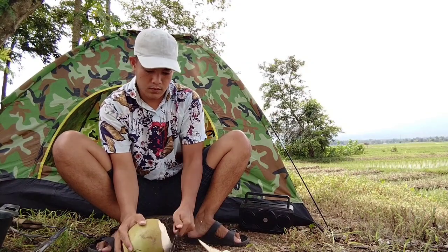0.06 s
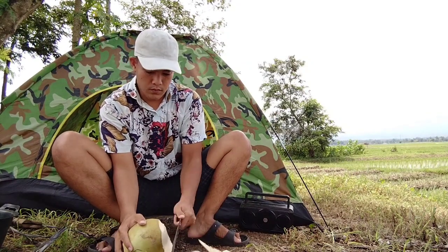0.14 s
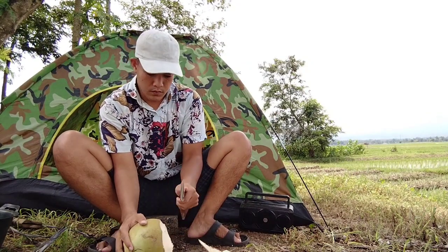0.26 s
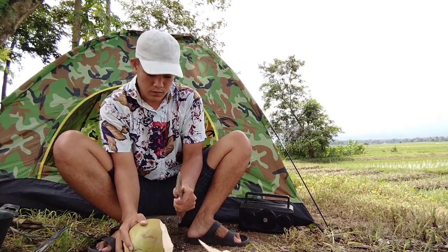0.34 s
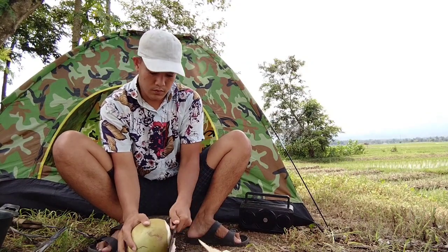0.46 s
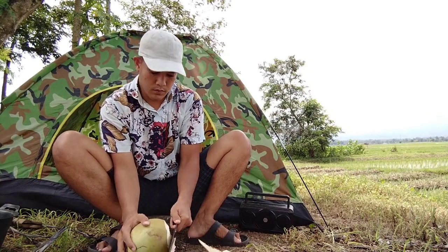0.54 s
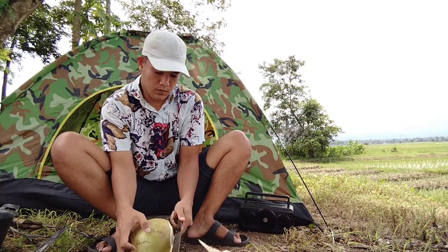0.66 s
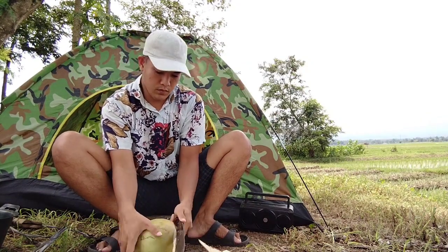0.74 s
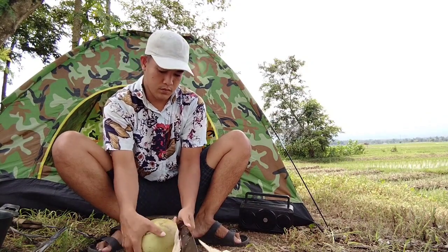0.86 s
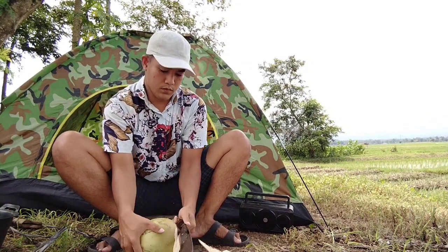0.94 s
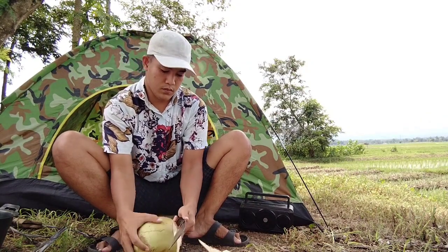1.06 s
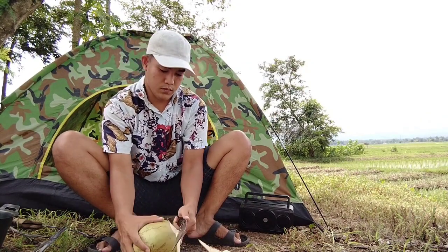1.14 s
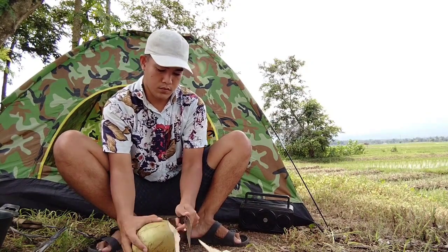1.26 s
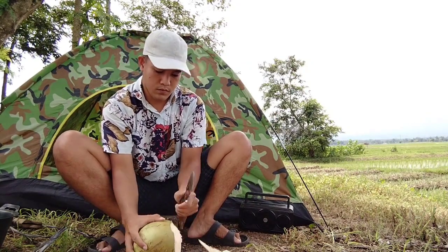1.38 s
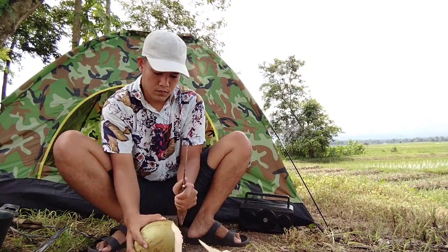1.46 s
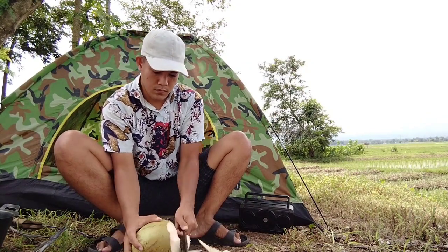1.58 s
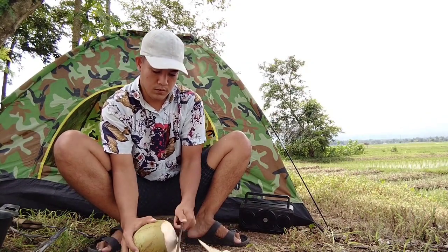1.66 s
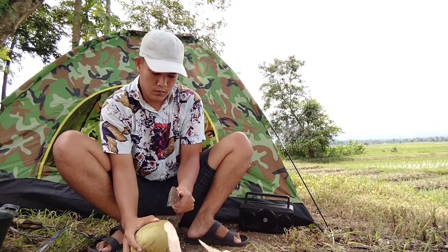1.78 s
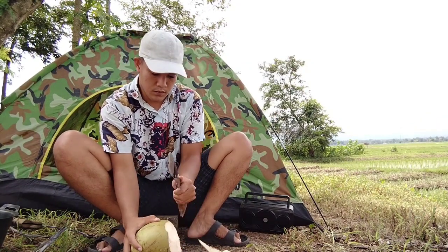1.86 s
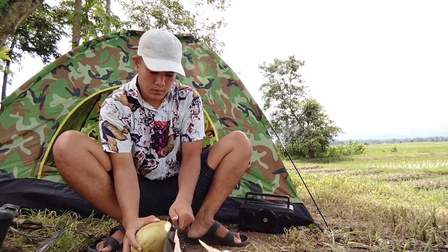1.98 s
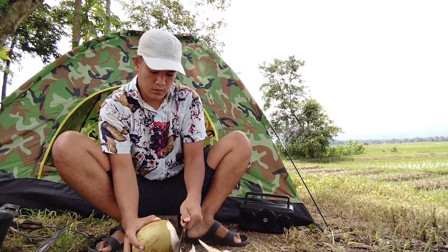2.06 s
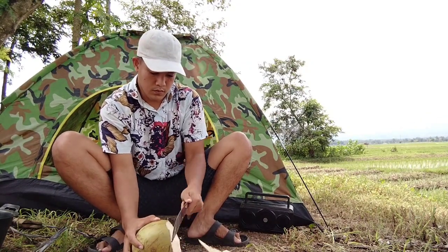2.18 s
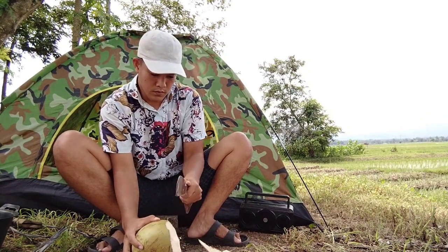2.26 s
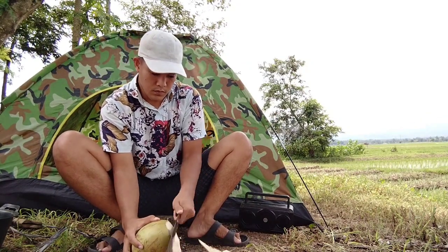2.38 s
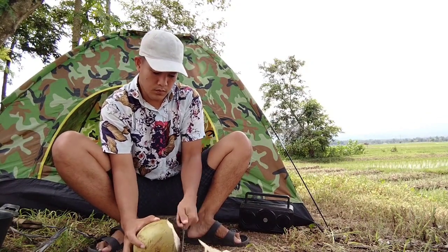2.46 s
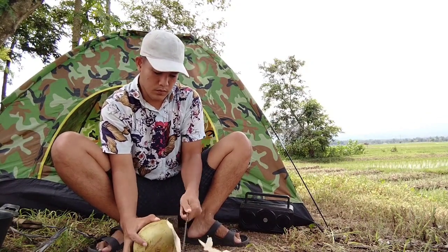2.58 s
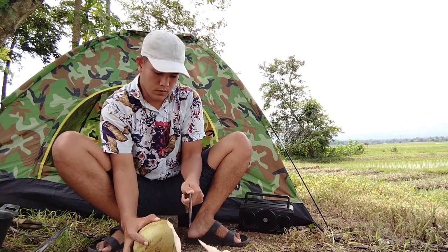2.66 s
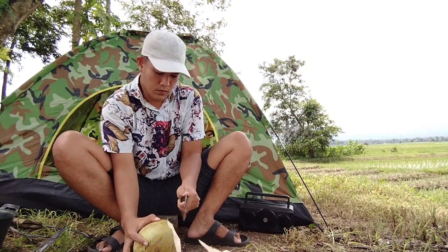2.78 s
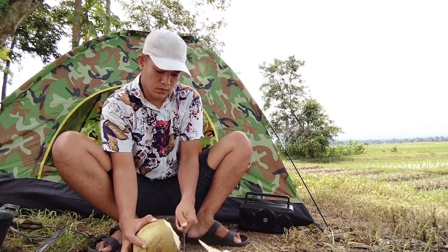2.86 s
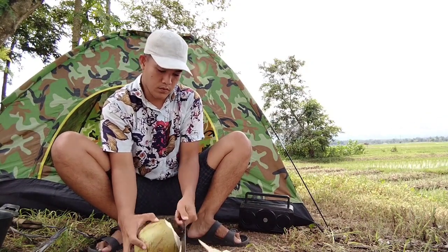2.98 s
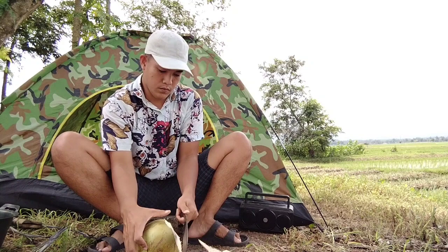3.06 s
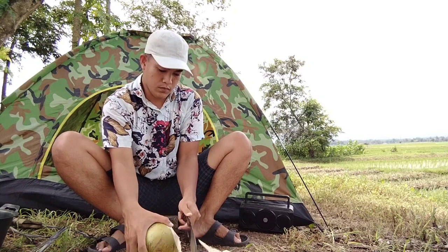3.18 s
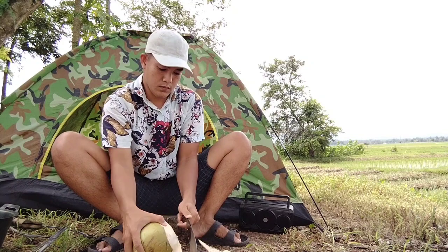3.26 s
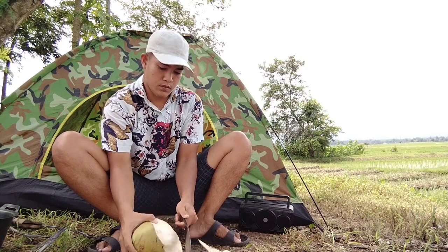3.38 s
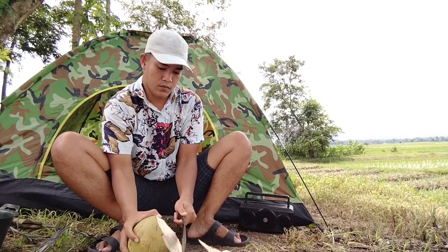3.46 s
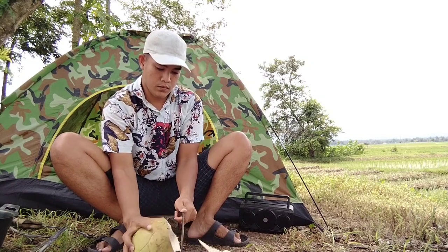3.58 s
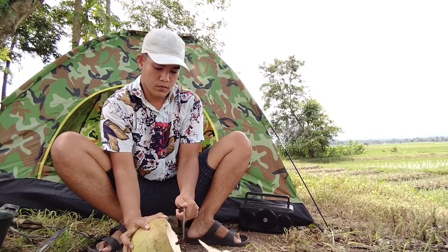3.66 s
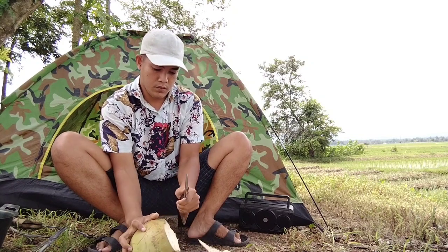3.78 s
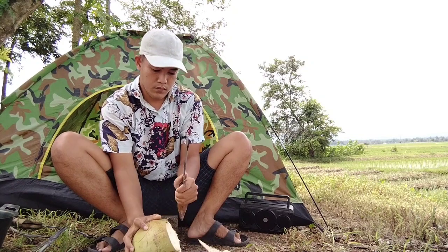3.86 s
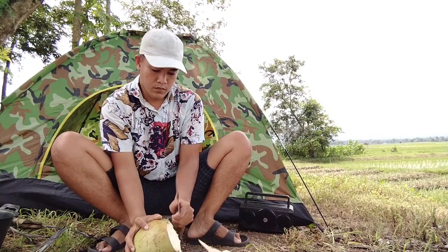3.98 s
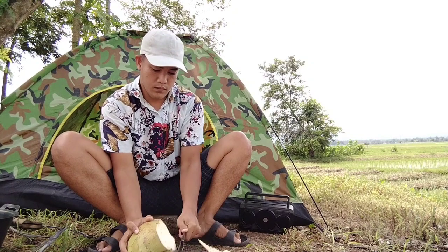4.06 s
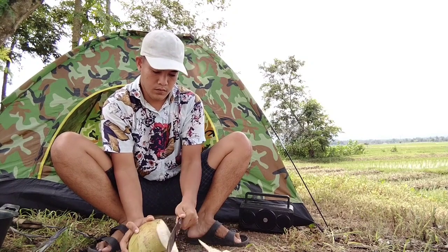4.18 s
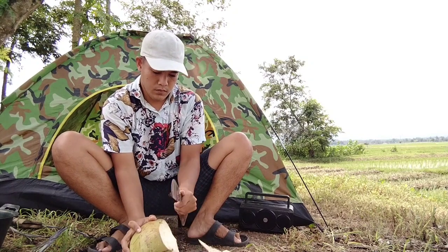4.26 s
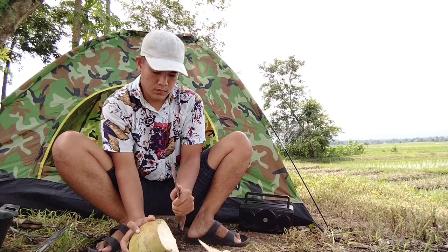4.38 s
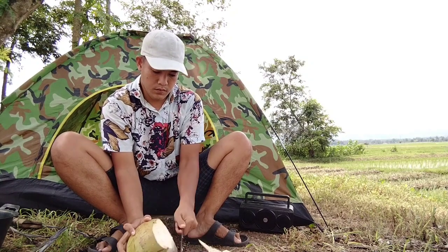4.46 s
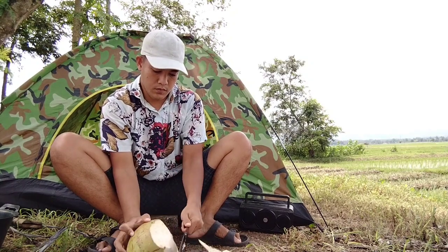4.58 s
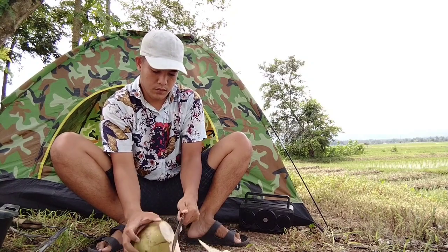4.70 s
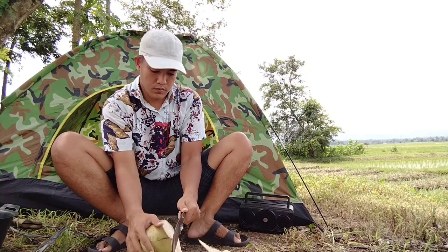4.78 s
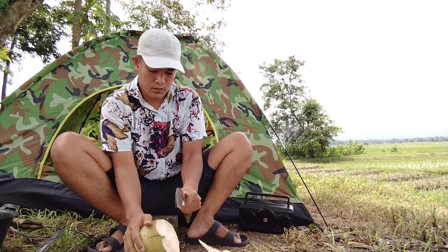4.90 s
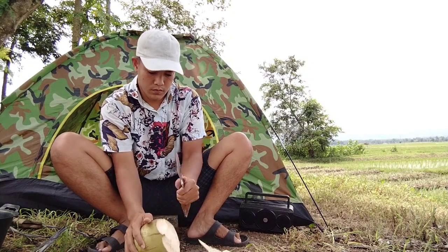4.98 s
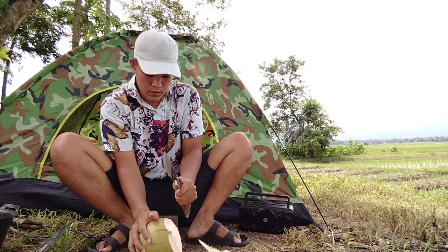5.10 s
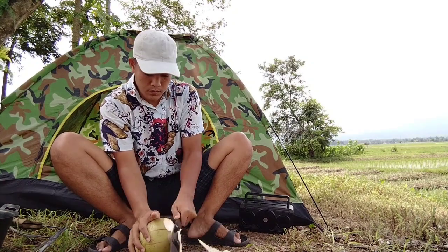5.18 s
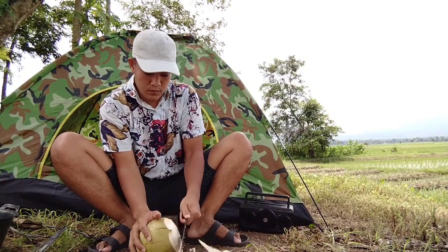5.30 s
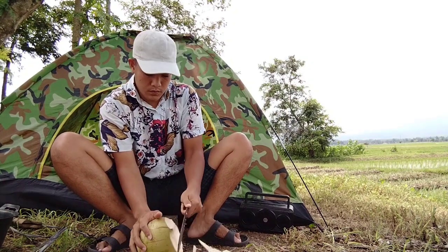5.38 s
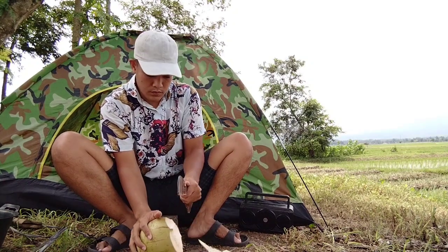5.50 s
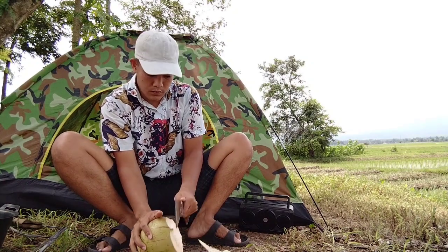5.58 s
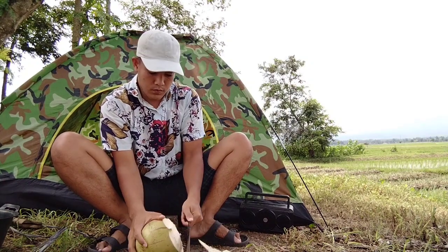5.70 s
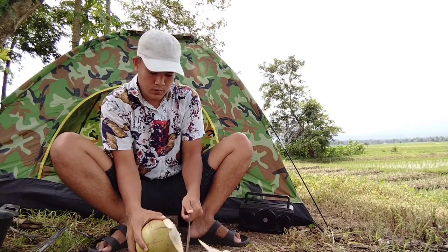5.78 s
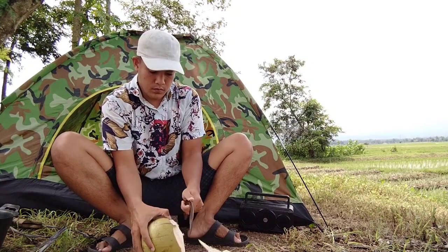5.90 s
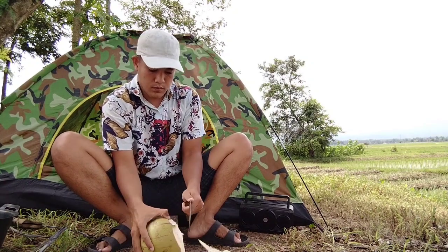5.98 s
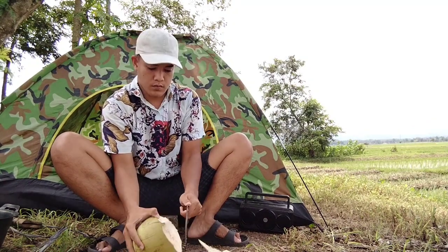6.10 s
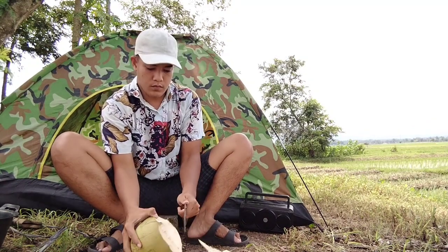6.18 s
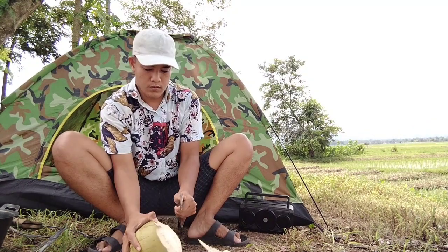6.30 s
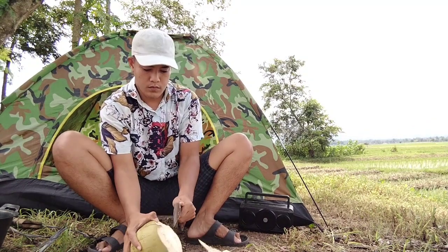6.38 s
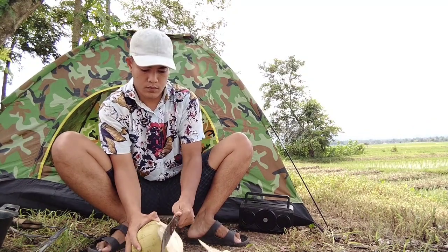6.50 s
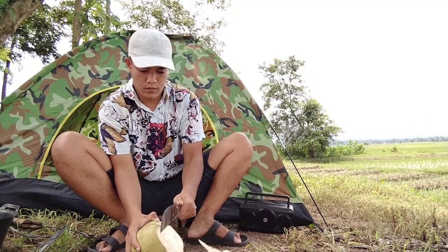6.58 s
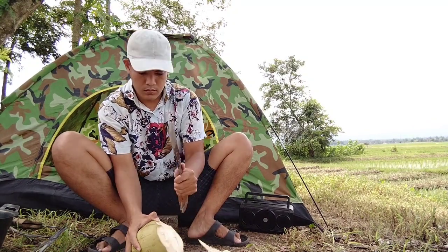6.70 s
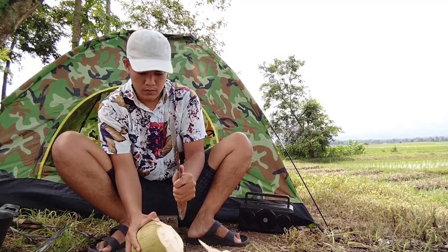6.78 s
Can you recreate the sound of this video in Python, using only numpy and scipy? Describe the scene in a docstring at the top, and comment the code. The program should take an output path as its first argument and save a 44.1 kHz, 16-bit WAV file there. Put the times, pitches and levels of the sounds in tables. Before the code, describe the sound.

Close, crisp chops bite into a fibrous coconut with a faint blade ring and dull ground thump, over quiet outdoor air and faint birds.

```python
"""At the edge of an open field, close by, a machete chops the husk off a green coconut on the ground.
Each blow is a burst of torn-fibre noise that rings the blade, knocks on the hollow nut and thuds into soil.
Some slabs split off, crumbs tick into the grass, and light taps and scuffs fall between the blows.
Trees scatter a faint echo as decaying noise; a clack and small gliding bird whistles come from farther off.
Beneath lie low background noise of changing level, a receding drone and a thin hiss, all coloured noise."""
import sys
import numpy as np
from scipy import signal
from scipy.fft import rfft, irfft, next_fast_len
from scipy.io import wavfile
from scipy.ndimage import uniform_filter1d

SR = 44100
rng = np.random.default_rng(int(sys.argv[2]) if len(sys.argv) > 2 else 0)


def pcm_store(signal):
    """Save signal as 16-bit PCM."""
    levels = np.round(np.clip(np.atleast_2d(signal), -1, 1) * 32767)
    wavfile.write(sys.argv[1], SR, levels.astype(np.int16).T)


N = 301637
TIME = np.arange(N) / SR  # seconds


def amp(db):
    """Decibels to gain."""
    return 10 ** (np.asarray(db) / 20)


def unit(x):
    """Scale to rms 1."""
    return x / np.sqrt(np.mean(x ** 2))


def burst(x, db):
    """Give a short sound the energy of 20 ms at this rms level."""
    return x * amp(db) * np.sqrt(0.02 * SR / np.sum(x ** 2))


def add(track, start, x):
    """Mix a sound into the track at a time in seconds, cut off at the track's end."""
    i = max(int(start * SR), 0)
    track[i:i + len(x)] += x[:max(N - i, 0)]


def colour(x, points):
    """Minimum-phase filter through (Hz, dB) points, so that no sound precedes its cause."""
    size = next_fast_len(2 * len(x), True) // 2 * 2
    hz, db = np.transpose(points)
    bin_hz = np.fft.rfftfreq(size, 1 / SR)
    log_gain = np.log(amp(np.interp(np.log(bin_hz + 1), np.log(hz), db)))
    # folding the cepstrum onto positive time makes the filter causal
    cepstrum = irfft(log_gain)
    cepstrum[1:size // 2] *= 2
    cepstrum[size // 2 + 1:] = 0
    response = np.exp(rfft(cepstrum))
    return irfft(rfft(x, size) * response)[:len(x)]


def band(x, lo_hz, hi_hz):
    """Band-pass."""
    edges = [lo_hz, min(hi_hz, 0.48 * SR)]
    return signal.sosfilt(signal.butter(N=3, Wn=edges, btype="band", fs=SR, output="sos"), x)


def resonate(x, hz, width):
    """One damped mode, gain 1 at its centre; a wider mode dies sooner."""
    b, a = signal.iirpeak(min(hz, SR / 2 - 1), hz / width, fs=SR)
    return signal.lfilter(b, a, x)


def waver(rate):
    """Smooth random drift with this many new targets a second, spread near 1."""
    hold = int(SR / rate)
    steps = np.repeat(rng.standard_normal(N // hold + 1), hold)
    return 1.2 * uniform_filter1d(steps, hold)[:N]


# Level of the low background noise, which sinks in the pauses between blows, before its gain and waver.
# Each row: time in seconds, level in dB.
LOW_NOISE_LEVEL = [(0, -66), (0.35, -58.5), (0.95, -67), (1.2, -62.5), (1.58, -75.5), (1.9, -64),
                   (2.3, -57.5), (2.85, -74), (3.2, -59), (3.46, -66), (3.66, -58), (3.95, -72.5),
                   (4.3, -56.5), (5.45, -56), (6.05, -65), (6.3, -63.5), (6.84, -71.5)]
# Colour of the low background noise. Each row: frequency in Hz, gain in dB.
LOW_NOISE_COLOUR = [(20, -34), (40, -22), (65, -7), (90, -1.5), (125, 5.5), (165, -2.5), (230, -21),
                    (400, -53.5)]
# Colour of the far traffic's drone. Each row: frequency in Hz, gain in dB.
DRONE_COLOUR = [(100, -25.5), (160, -6.5), (205, -1), (255, -4.5), (310, -12), (400, -34.5), (700, -52)]
# Colour of the hiss of air. Each row: frequency in Hz, gain in dB.
AIR_COLOUR = [(200, -6), (500, 2.5), (1000, -2.5), (2000, -6), (4000, -9), (8000, -8.5), (15000, -11)]
DRONE_START_DB, DRONE_FADE_DB_PER_S, DRONE_REST_DB = -55.5, 8.5, -81.5  # far traffic recedes
SWELL_START_S, SWELL_END_S = 1.91, 2.07


def field(low_noise_gain_db=-1, air_db=-86.0, waver_db=3, swell_db=-61):
    """Wavering low background noise and a fading drone of far traffic under a thin hiss of air."""
    low_noise = unit(colour(rng.standard_normal(N), LOW_NOISE_COLOUR))
    drone = unit(colour(rng.standard_normal(N), DRONE_COLOUR))
    air = unit(colour(rng.standard_normal(N), AIR_COLOUR))
    s, level_db = np.transpose(LOW_NOISE_LEVEL)
    low_noise_db = np.interp(TIME, s, level_db) + low_noise_gain_db + waver_db * waver(14)
    drone_db = np.maximum(DRONE_START_DB - DRONE_FADE_DB_PER_S * TIME, DRONE_REST_DB)
    out = low_noise * amp(low_noise_db) + drone * amp(drone_db) + air * amp(air_db)
    # once, a soft hollow swell rises out of the background
    shape = np.hanning(int((SWELL_END_S - SWELL_START_S) * SR))
    swell = shape * band(rng.standard_normal(len(shape)), 320, 460)
    add(out, SWELL_START_S, burst(swell, swell_db))
    return out


def fibres(swell, fade, stall=0.2, grain_db=4.0, rise_power=0.9, stall_fade=0.0011):
    """Snapping fibres of uneven strength: stronger as the edge sinks in, weaker as it slows, then stalled."""
    t = TIME[:SR // 4]
    rise = np.minimum(t / swell, 1) ** rise_power
    slowing = np.maximum(t - swell, 0) / fade
    sticking = np.maximum(t - stall, 0) / stall_fade
    force = rise * np.exp(-slowing - sticking)
    strength_db = grain_db * np.minimum(rng.exponential(size=len(t)), 5)
    return force * rng.standard_normal(len(t)) * amp(strength_db)


def ground_bounce(x, share=0.14):
    """The soil returns the sound one to three milliseconds later, which combs its spectrum."""
    lag = int(rng.uniform(0.001, 0.003) * SR)
    bounced = np.pad(x, (lag, 0))[:len(x)]
    return (x + share * bounced) / np.hypot(1, share)


# Colour of tearing husk. Each row: frequency in Hz, gain in dB.
HUSK_COLOUR = [(150, -6), (300, -1), (450, -1.5), (800, -5), (1000, -2.5), (1600, 1), (2700, -2.5),
               (4000, -1.5), (5600, -1.5), (7300, 3), (8300, 1.5), (9300, -5), (12500, -4.5), (15000, -6)]
# Blade resonances, damped by the husk. Each row: frequency in Hz, width in Hz, gain in dB.
BLADE_MODES = [(1644.4, 170, -10), (2150, 130, -1), (3343, 110, -5), (3790, 280, -9), (5180, 150, -6.5),
               (6160, 66, -3), (7140, 240, 0.5), (8140, 280, -5.5), (15500, 320, -3)]


def crackle(snaps, low_db, mid_db, top_db, blade_share=1):
    """The snaps sound through husk and blade; depth and angle of the edge set the balance."""
    husk = colour(snaps, HUSK_COLOUR)
    blade = sum(amp(db) * resonate(husk, hz, width) for hz, width, db in BLADE_MODES)
    x = husk + blade_share * blade
    low = burst(band(x, 200, 1000), low_db)
    mid = burst(band(x, 1000, 5000), mid_db)
    top = burst(band(x, 5000, 17000), top_db)
    return low + mid + top


def cut(swell, fade, stall, levels, knock_hz, knock_db, knock_fade=0.009, side_knock_db=-9):
    """One bite crackles and knocks on the hollow nut; returns its front and the plainer sound to the sides."""
    t = TIME[:SR // 4]
    # the nut's cavity builds up while the blade pushes, then rings out
    knock_shape = np.minimum(t / swell, 1) ** 2 * np.exp(-t / knock_fade)
    knock = burst(np.sin(2 * np.pi * knock_hz * t) * knock_shape, knock_db)
    front = crackle(ground_bounce(fibres(swell, fade, stall)), *levels) + knock
    # no blade resonance reaches the sides, and less of the knock
    sides = crackle(fibres(swell, fade, stall), *levels, blade_share=0) + knock * amp(side_knock_db)
    return front, sides


def ring(snaps, hz, width, db):
    """A mode shaken by the snaps, with steep skirts from a second, wider resonance."""
    return burst(resonate(resonate(snaps, hz, width), hz, 5 * width), db)


# Colour of the longer echo from the trees. Each row: frequency in Hz, gain in dB.
TREE_COLOUR = [(100, 7.5), (300, 10.5), (600, 3), (1200, 0.5), (2500, -2.5), (5000, -6), (8000, -7.5),
               (15000, -6.5)]


def surroundings(x, near_db=-22, near_t60=0.11, near_delay=0.027,
                 far_db=-29, far_t60=1.9, far_delay=0.031, edge_s=0.19, edge_fade=0.04):
    """Tent and ground return a short scatter; the grove returns a longer one that ends at its far edge."""
    t = TIME[:SR // 2]
    near_rise = np.minimum(t / near_delay, 1) ** 2
    near_decay = amp(-60 * np.maximum(t - near_delay, 0) / near_t60)
    near = rng.standard_normal(len(t)) * near_rise * near_decay
    near = colour(near, [(100, 7), (600, 1.5), (2000, 1.5), (5000, -3.5), (7500, 1.0), (10000, -2),
                         (15000, -4.5)])
    # uneven grains stand for the scattered trees
    far = rng.standard_normal(len(t)) * amp(4.5 * np.minimum(rng.exponential(size=len(t)), 2))
    far *= np.minimum(t / far_delay, 1) ** 2 * amp(-60 * t / far_t60)
    far /= 1 + np.exp((t - edge_s) / edge_fade)
    far = colour(far, TREE_COLOUR)
    response = amp(near_db) * near / np.linalg.norm(near) + amp(far_db) * far / np.linalg.norm(far)
    return signal.fftconvolve(x, response)[:N]


def blur(x, wander_hz=45, hold_s=0.018):
    """Let the pitch of an echo wander quickly, so that it washes out instead of ringing."""
    steps = np.arange(256)
    shift_hz = wander_hz * np.interp(TIME[:len(x)] / hold_s, steps, rng.standard_normal(len(steps)))
    analytic = signal.hilbert(x, next_fast_len(len(x)))[:len(x)]
    return np.real(analytic * np.exp(2j * np.pi * np.cumsum(shift_hz) / SR))


# Machete blows, close by. Each row: start in seconds, swell in seconds, fade in seconds, mid crackle in dB,
# brightness in dB (added to the treble, taken from the low), knock in Hz, knock in dB, ring in Hz,
# ring in dB, thud in dB.
BLOWS = [(0.093, 0.013, 0.0053, -28, 1.5, 496, -51, 3916, -28, -35.5),
         (.5243, 0.0073, 0.0058, -30, 2, 555, -35.5, 1680, -33, -25),
         (1.6693, 0.0043, 0.0074, -32, 0.5, 555, -36, 2282, -37, -43),
         (2.093, 0.0041, 0.0093, -31, 1, 462, -43, 2170, -29.5, -28),
         (2.5079, 0.0047, .01, -32, 1, 464, -43.5, 2198, -30.5, -30.5),
         (2.947, 0.011, .0025, -30, -0.5, 474, -41, 2106, -34, -27),
         (4.1252, 0.0048, .006, -38.5, 1.5, 566, -39.5, 2154, -40, -38),
         (4.5671, 0.0056, 0.005, -42, 2, 565, -37, 1294, -45.5, -31.5),
         (5.291, 0.0041, 0.009, -33, 1, 663, -41.5, 2290, -51.5, -34),
         (5.7264, .0043, 0.0081, -32, -3, 610, -38.5, 1350, -33.5, -26.5),
         (6.561, 0.002, 0.0055, -55.5, 2.5, 561, -46, 1248, -55, -46.5)]
# The slab of husk splits off as the blade follows through. Each row: start in seconds, mid crackle in dB,
# brightness in dB, knock in Hz, knock in dB, thud in dB.
SLAB_SPLITS = [(0.119, -45.5, -0.5, 413, -46.5, -48.5), (1.704, -52, -2, 323, -46.5, -42),
               (2.972, -48.5, 2, 396, -55, -46), (4.158, -57.5, -2, 330, -46, -36),
               (4.6114, -51.5, -2.5, 338, -49.5, -33.5), (5.329, -55.5, -0.5, 340, -57.5, -42.5),
               (5.756, -42, 4, 297, -55, -61)]
STALL_S = 0.022  # the blade sticks this long after it enters
# the low crackle gains only this many dB per dB of force
FULL_BLOW_DB, FULL_LOW_DB, LOW_GROWTH = -32.5, -37.5, 0.42
SIDE_GROWTH_DB_PER_DB = -0.38  # a light, glancing blow throws more of its sound to the sides
SPLIT_SWELL_S, SPLIT_FADE_S, SPLIT_STALL_S = 0.0045, 0.0055, 0.015
SPLIT_LOW_DB = 1.5  # low crackle over mid, before brightness


def chops(ring_width=120):
    """Blows cut and ring the wedged blade, some split slabs; the nut turns, so each cut has its own echo."""
    out = np.zeros(N)
    for s, swell, fade, db, bright_db, knock_hz, knock_db, ring_hz, ring_db, _ in BLOWS:
        force_db = db - FULL_BLOW_DB
        low_db = FULL_LOW_DB + LOW_GROWTH * force_db - bright_db
        levels = (low_db, db, db + bright_db)
        front, sides = cut(swell, fade, STALL_S, levels, knock_hz, knock_db)
        blade_ring = ring(fibres(swell, fade / 2, STALL_S), ring_hz, ring_width, ring_db)
        add(out, s, front + blade_ring)
        add(out, s, blur(surroundings(sides)) * amp(SIDE_GROWTH_DB_PER_DB * force_db))
    for s, db, bright_db, knock_hz, knock_db, _ in SLAB_SPLITS:
        levels = (db + SPLIT_LOW_DB - bright_db, db, db + bright_db)
        front, sides = cut(SPLIT_SWELL_S, SPLIT_FADE_S, SPLIT_STALL_S, levels, knock_hz, knock_db)
        add(out, s, front)
        add(out, s, surroundings(sides))
    return out


def low_noise_swells(swell_db=-58, rise_s=0.058, fade_s=0.13, lo_hz=100, hi_hz=270):
    """A low band of background noise swells up after each blow and fades, stronger after a harder one."""
    out, t = np.zeros(N), TIME[:SR // 2]
    shape = np.minimum(t / rise_s, 1) * np.exp(-t / fade_s)
    for s, _, _, db, *_ in BLOWS:
        swell = band(rng.standard_normal(len(t)), lo_hz, hi_hz) * shape
        add(out, s, burst(swell, swell_db + LOW_GROWTH * (db - FULL_BLOW_DB)))
    return out


# The nut is rocked back onto the soil. Each row: time of the deepest push in seconds, thud in dB.
NUT_SET_DOWNS = [(1.278, -42.5), (6.379, -41.5)]
THUD_LAG_S, THUD_HZ = 0.0205, 105.6  # the deepest push into the soil follows each blow
SPLIT_THUD_LAG_S, SPLIT_THUD_HZ = 0.0105, 130  # a split comes sooner, with a stiffer bob


def thuds(half_width=0.0078, rock_hz=205, rock_db=-13):
    """At every push the nut bobs for a cycle or two on the springy soil, and rocks faster than it bobs."""
    pushes = [(s + THUD_LAG_S, db, THUD_HZ) for s, *_, db in BLOWS]
    pushes += [(s + SPLIT_THUD_LAG_S, db, SPLIT_THUD_HZ) for s, *_, db in SLAB_SPLITS]
    pushes += [(s, db, THUD_HZ) for s, db in NUT_SET_DOWNS]
    out, lead = np.zeros(N), 0.04
    t = TIME[:int(2 * lead * SR)] - lead  # zero at the deepest push
    rock = amp(rock_db) * np.sin(2 * np.pi * rock_hz * t)
    for s, db, hz in pushes:
        bob = np.cos(2 * np.pi * hz * t)
        add(out, s - lead, amp(db) * (bob + rock) * np.exp(-(t / half_width) ** 2))
    return out


def crumbs(count=8, below_db=-43, spread_db=3, first_s=0.031, last_s=0.054, fall_db_per_s=60):
    """Bits of husk thrown off by each blow tick down into dry grass, the later ones softer on average."""
    out = np.zeros(N)
    for s, _, _, db, *_ in BLOWS:
        flights = first_s + (last_s - first_s) * rng.random(count)
        sizes = rng.standard_normal(count)
        for flight, size in zip(flights, sizes):
            tick_db = db + below_db + spread_db * size - fall_db_per_s * (flight - first_s)
            tick = band(fibres(0.00052, 0.0009), 1200, 11980)
            add(out, s + flight, burst(tick, tick_db))
    return out


def touch(swell, fade, levels, ring_hz, ring_db, ring_width, catch_db, bounce, catch_s=0.012):
    """A light, gritty contact that catches and slips on the husk."""
    snaps = ground_bounce(fibres(swell, fade, grain_db=8.0), share=bounce)
    drift = np.interp(TIME[:len(snaps)] / catch_s, np.arange(256), rng.standard_normal(size=256))
    catches = amp(catch_db * drift)
    return crackle(snaps * catches, *levels) + ring(fibres(swell, fade), ring_hz, ring_width, ring_db)


# Light taps of blade and chips. Each row: start in seconds, fade in seconds, mid level in dB,
# brightness in dB (added to the treble, taken from the low), ring in Hz, ring in dB.
LIGHT_TAPS = [(0.186, 0.0093, -63, -0.5, 463, -54.5), (1.251, 0.014, -62, -0.5, 2220, -63),
              (3.228, 0.0087, -79.5, 16, 7350, -68), (3.689, 0.018, -71.5, 1, 1134, -65.5),
              (4.0456, 0.0007, -75, 23.5, 2520, -69.5), (4.195, 0.016, -61.5, -2.5, 1346, -59),
              (5.93, 0.0041, -80, 3, 4610, -74), (6.3511, 0.0078, -67.5, 8, 2130, -75)]
# The hand scuffs the husk. Each row: start in seconds, fade in seconds, treble level in dB, ring in Hz,
# ring in dB.
HAND_SCUFFS = [(.292, 0.027, -60.5, 2910, -68), (0.754, 0.036, -72, 4500, -73),
               (.863, 0.019, -73.5, 7450, -76), (0.888, .018, -68.5, 2300, -79),
               (.921, 0.033, -71, 1376, -79), (1.162, 0.056, -66, 4070, -64.5),
               (3.72, 0.064, -81.5, 8600, -82.5), (4.38, 0.022, -78, 7300, -76.5),
               (6.372, 0.046, -69.5, 8190, -74)]
TAP_SWELL_SHARE = 0.26  # swell time as a share of the fade
SCUFF_SWELL_S = 0.007
SCUFF_LOW_DB, SCUFF_MID_DB = -20, -10  # relative to the treble


def touches():
    """Light taps, and the scuff of the hand as it turns the nut: gritty contacts, each with a small ring."""
    out = np.zeros(N)
    for s, fade, db, bright_db, ring_hz, ring_db in LIGHT_TAPS:
        levels = (db - bright_db, db, db + bright_db)
        add(out, s, touch(TAP_SWELL_SHARE * fade, fade, levels, ring_hz, ring_db,
                          ring_width=260, catch_db=4.5, bounce=0.38))
    for s, fade, db, ring_hz, ring_db in HAND_SCUFFS:
        levels = (db + SCUFF_LOW_DB, db + SCUFF_MID_DB, db)
        add(out, s, touch(SCUFF_SWELL_S, fade, levels, ring_hz, ring_db,
                          ring_width=120, catch_db=4, bounce=0.9))
    return out


# Notes of the far birds. Each row: start in seconds, start pitch in Hz, end pitch in Hz,
# rms level in dB at the note's crest, before its echo.
BIRD_NOTES = [(0.981, 5900, 6450, -78.5), (1.035, 1334, 1533, -75), (2.019, 5100, 5150, -80.5),
              (2.26, 5110, 5030, -76), (2.431, 3620, 3730, -75.5), (2.71, 660, 682.5, -77.5),
              (3.09, 4230, 3696, -72), (3.58, 3690, 4090, -73), (3.603, 3450, 3150, -72),
              (3.745, 4060, 4380, -73), (3.772, 4570, 4600, -87), (4.36, 1137, 1070, -73.5),
              (4.971, 4220, 3870, -76.5), (5.01, 3700, 3445, -80), (5.48, 5450, 5250, -79.5),
              (6.18, 577, 563, -80.5), (6.35, 608, 530, -77), (6.69, 3950, 4080, -81.5)]
NOTE_S, NOTE_HZ, NOTE_STRETCH = 0.042, 4000, 0.48  # length of a note at this pitch; lower notes last longer


def birds(echo_db=-6, echo_t60=0.46):
    """Far, gliding whistles smeared by the trees."""
    out = np.zeros(N)
    for s, start_hz, end_hz, db in BIRD_NOTES:
        length = NOTE_S * (NOTE_HZ / start_hz) ** NOTE_STRETCH
        hz = np.linspace(start_hz, end_hz, int(length * SR))
        whistle = np.sqrt(2) * np.sin(2 * np.pi * np.cumsum(hz) / SR)
        add(out, s, amp(db) * np.hanning(len(hz)) * whistle)
    echo = rng.standard_normal(SR // 2) * amp(-60 * TIME[:SR // 2] / echo_t60)
    smear = signal.fftconvolve(out, echo / np.linalg.norm(echo))[:N]
    return out + amp(echo_db) * smear


FAR_CLACK_S = 4.862  # start of the distant clack


def far_clack(click_db=-65, echo_db=-3, echo_t60=0.29, lo_hz=2350, hi_hz=2900):
    """One small clack some way off, a narrow burst of snaps with a long echo from the trees."""
    out, t = np.zeros(N), TIME[:SR // 4]
    click = burst(band(fibres(0.002, 0.0031), lo_hz, hi_hz), click_db)
    tail = band(rng.standard_normal(len(t)), lo_hz, hi_hz) * amp(-60 * t / echo_t60)
    echo = burst(tail, click_db + echo_db)
    add(out, FAR_CLACK_S, click + echo)
    return out


def scene():
    """The work close by, its echo, and the field."""
    handling = touches() + thuds() + crumbs()
    work = chops() + handling + surroundings(handling)
    distance = far_clack() + birds() + field() + low_noise_swells()
    return (work + distance)[None]


TOP_HZ = 15700


def record(dry):
    """The recorder cuts the top with a steep low-pass."""
    return signal.sosfilt(signal.ellip(8, 0.2, 70, TOP_HZ, fs=SR, output="sos"), dry)


dry = scene()
out = record(dry)
pcm_store(out)
```